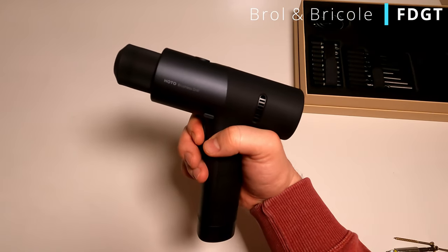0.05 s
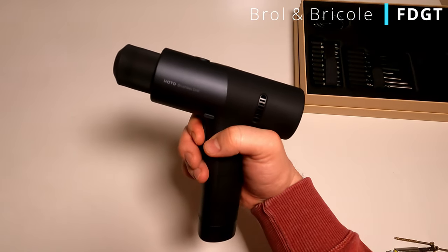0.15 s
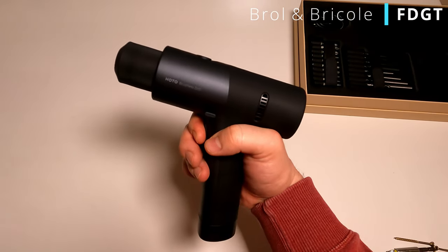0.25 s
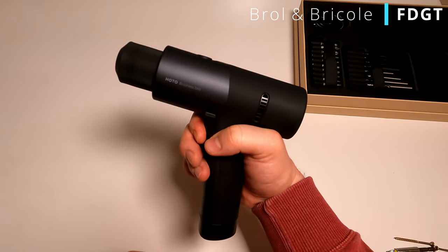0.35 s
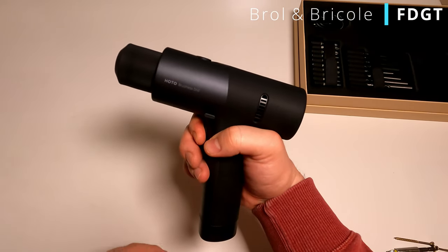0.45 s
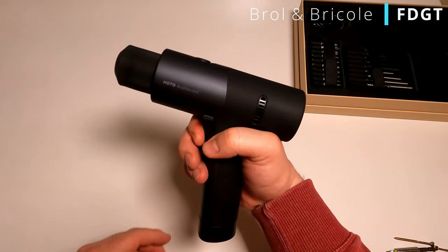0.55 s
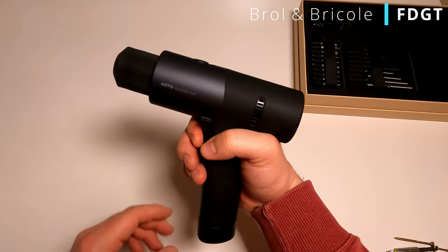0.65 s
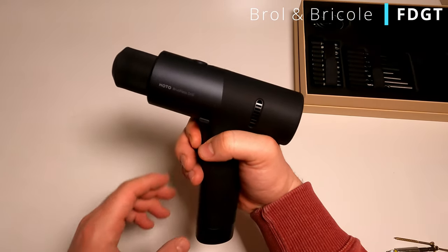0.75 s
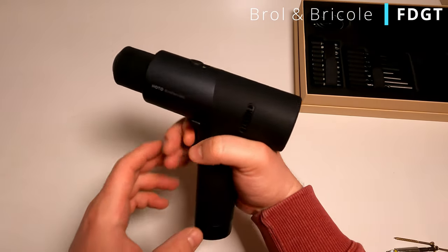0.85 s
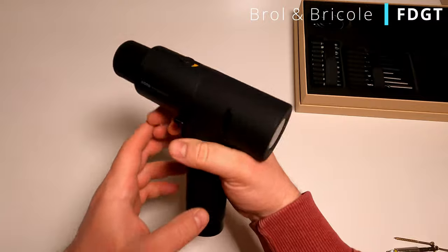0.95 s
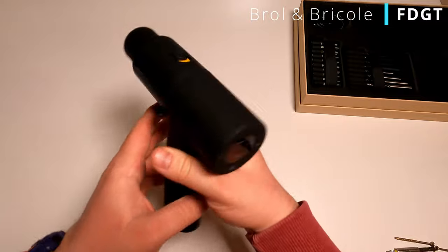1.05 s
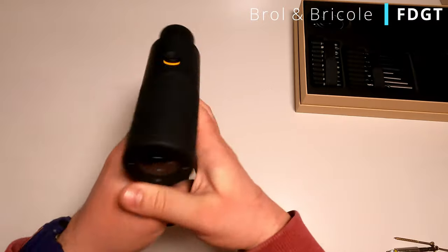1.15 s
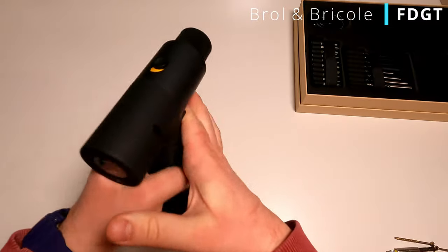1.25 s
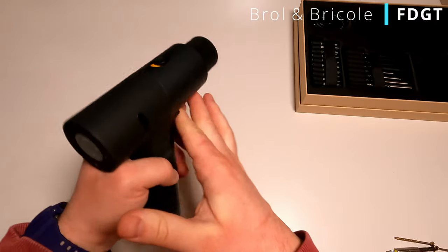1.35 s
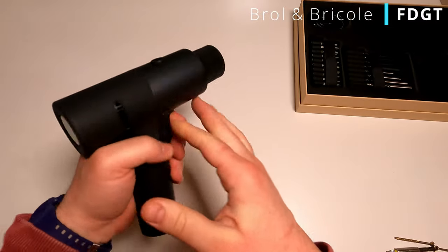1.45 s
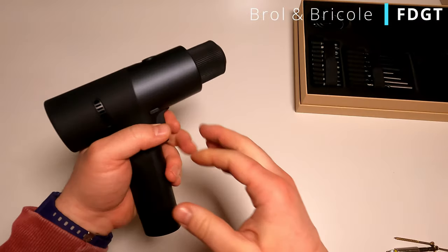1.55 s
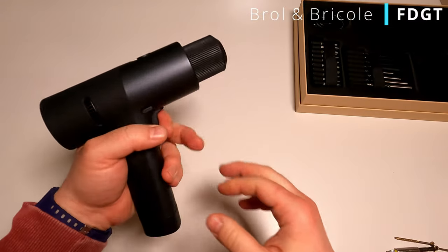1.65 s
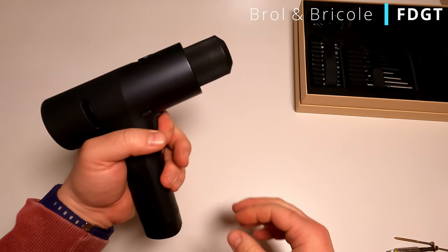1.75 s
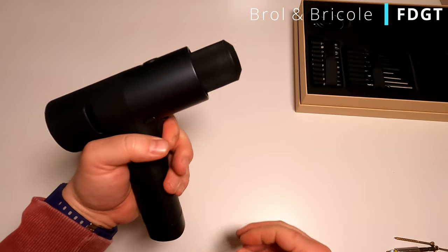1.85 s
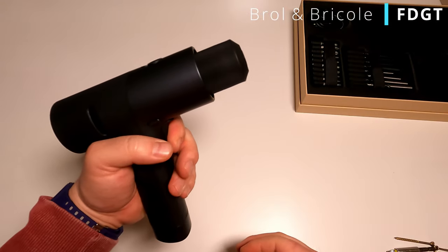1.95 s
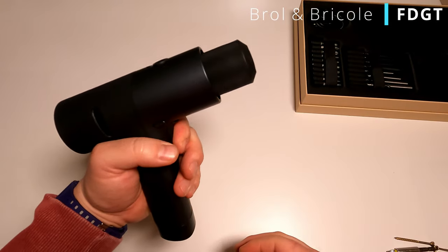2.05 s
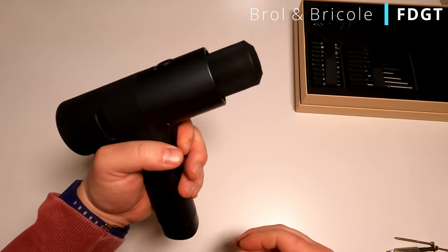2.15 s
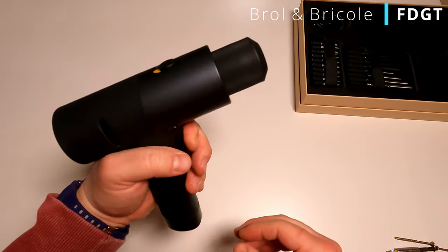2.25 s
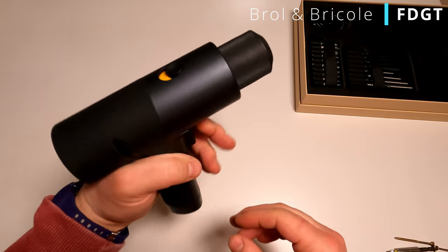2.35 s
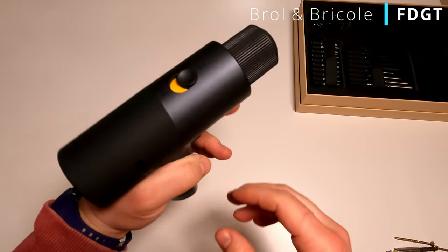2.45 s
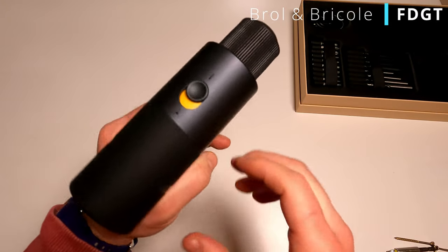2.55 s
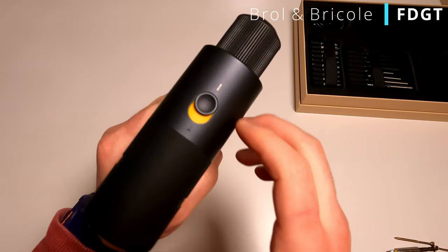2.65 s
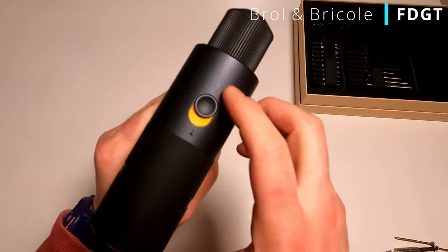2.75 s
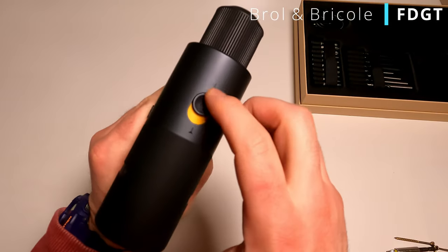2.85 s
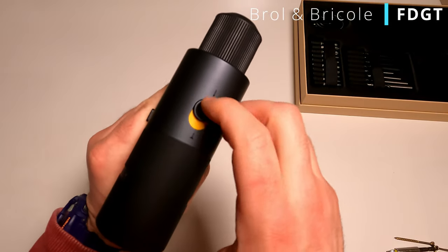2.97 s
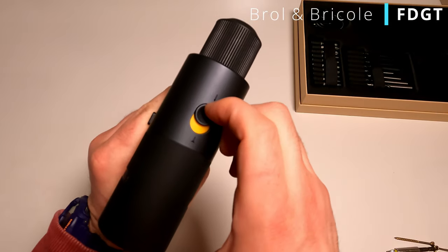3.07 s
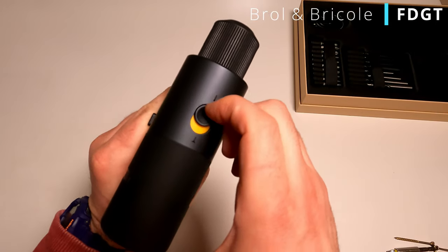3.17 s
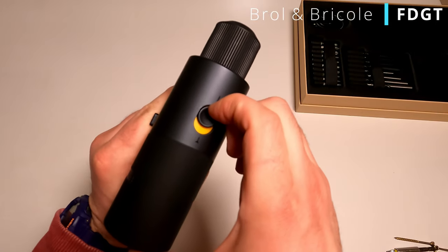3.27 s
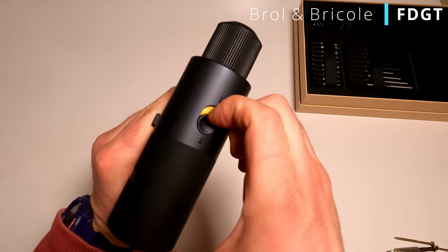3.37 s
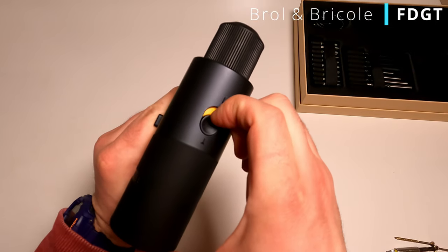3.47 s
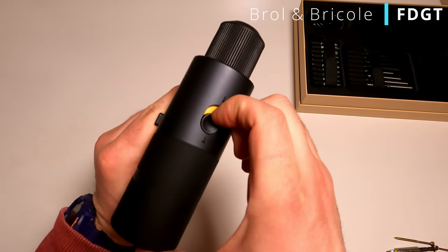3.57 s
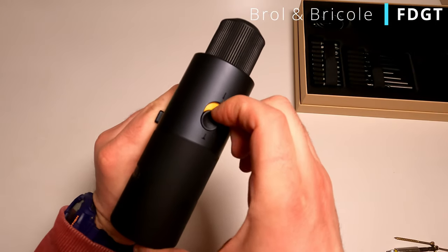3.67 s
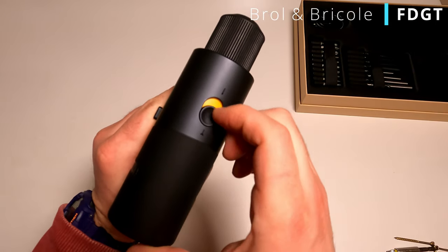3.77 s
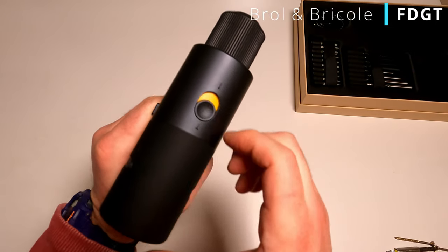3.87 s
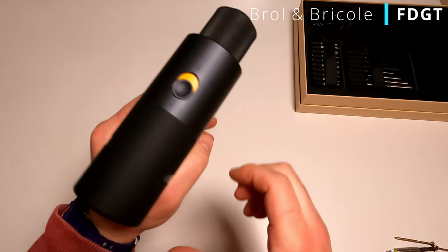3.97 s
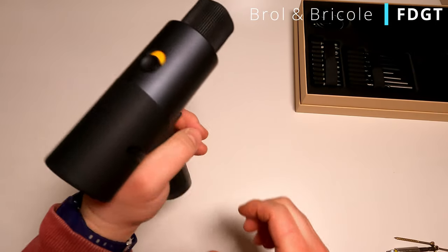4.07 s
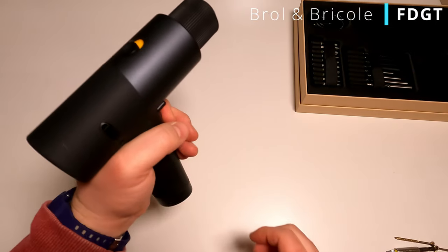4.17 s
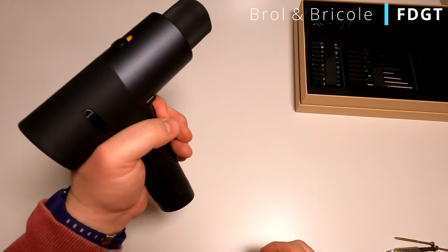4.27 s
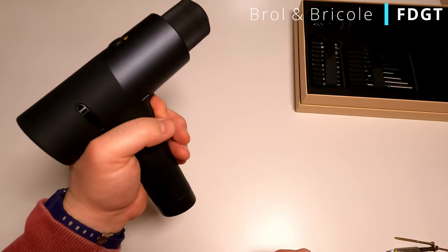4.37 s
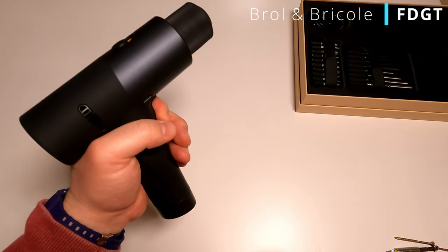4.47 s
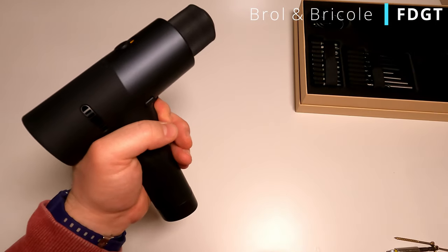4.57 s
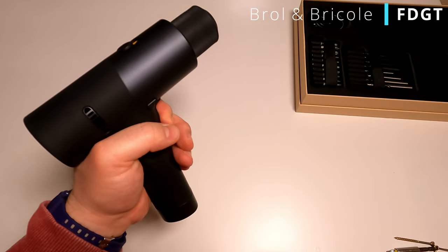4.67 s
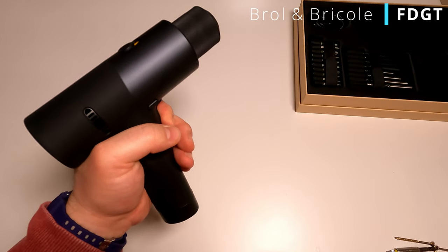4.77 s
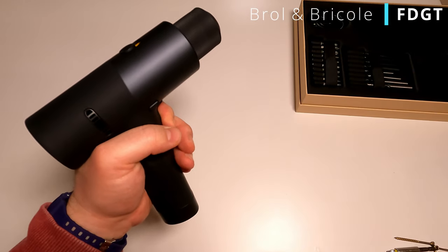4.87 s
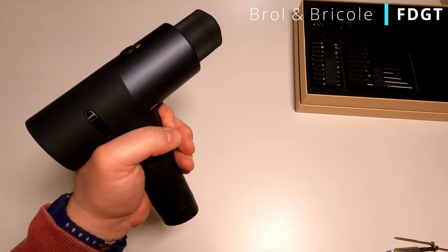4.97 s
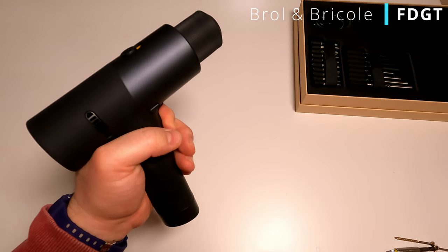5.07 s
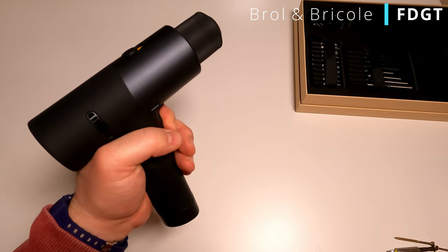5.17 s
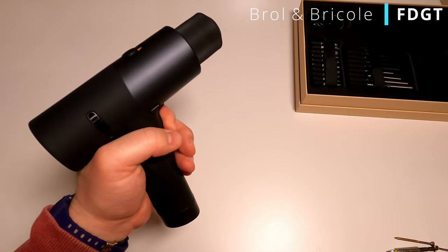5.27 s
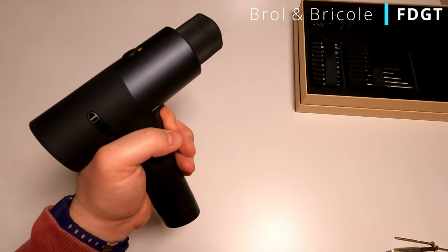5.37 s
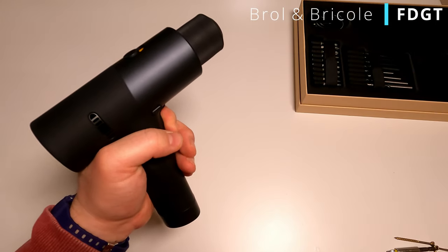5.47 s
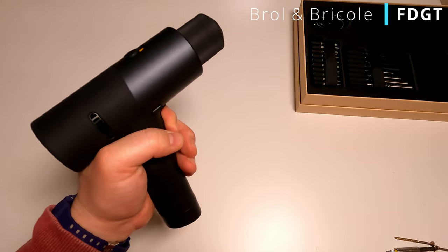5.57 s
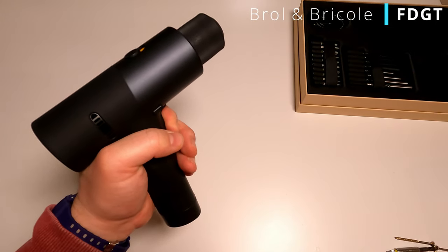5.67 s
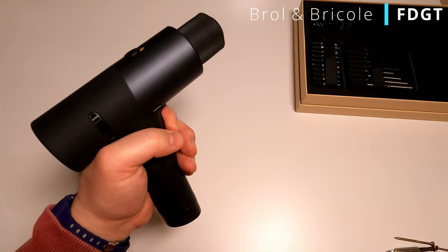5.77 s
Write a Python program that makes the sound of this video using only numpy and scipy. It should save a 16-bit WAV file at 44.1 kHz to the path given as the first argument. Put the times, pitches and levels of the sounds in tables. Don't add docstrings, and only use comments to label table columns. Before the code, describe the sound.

A small brushless screwdriver, already running, whirs and rattles in quick regular surges, then brakes with clicks. Soft grip rustling follows, then a trigger click and a shorter run. Faint finger rubs lead to one sharp slider snap, then another click starts a longer pulsing run that never stops. Close stereo pickup over a table in a quiet, lightly ringing room.

```python
import sys
import numpy as np
from scipy import signal
from scipy.fft import rfft, irfft, next_fast_len
from scipy.io import wavfile
from scipy.ndimage import map_coordinates

SR = 44100
rng = np.random.default_rng(int(sys.argv[2]) if len(sys.argv) > 2 else 0)


def store_pcm(level_fs):
    pcm = np.round(np.clip(level_fs, -1, 1) * 32767).astype(np.int16)
    wavfile.write(sys.argv[1], SR, np.atleast_2d(pcm).T)


def voltage_ratio(decibels):
    exponent = np.asarray(decibels, float) / 20
    return 10 ** exponent


N = 256662

# power_on_s, first_kick_s, trigger_released_s, rotor_braked_s, spindle_locked_s
RUNS = [
    (-.3, -.059, 1.0, 1.125, 1.16),
    (1.8, 2.021, 2.43, 2.5, 2.525),
    (4.187, 4.3985, 6, 6.1, 6.2),
]


def motor():
    orders = [3, 4, 5, 6, 7, 8]
    order_levels = [1, -6.5, 0, -13, 0.5, 0.5]
    # carrier_hz, sideband in electrical orders (the upper carrier is a folded overtone)
    switching_tones = [(9968, 1), (9968, 0), (9968, -1), (9968, 2), (14032, -1), (14032, 0)]
    switching_levels = [-16.5, -24, -19.5, -43.5, -27.5, -52.5]
    whine_levels = [-3.5, -5.5, -2.5]
    # freq_hz, level_db
    shells = [
        [(800, -6), (1200, 1), (1400, -1), (1650, -6), (1900, -9.5), (2050, 1.5), (2350, -5), (2550, -5),
         (2800, -1.5), (3050, -3), (3300, -17), (3700, -7.5), (4500, -20.5)],
        [(900, -13.5), (1200, -8.5), (1400, -16), (1650, -2), (1900, -4.5), (2050, -11.5), (2350, -18),
         (2550, -3), (2800, -10.5), (3050, 1), (3300, -6.5), (3700, -7.5), (4500, -24)],
        [(800, -12), (1200, -8.5), (1400, -7), (1650, 1.5), (1900, 3), (2050, 0), (2350, -9), (2550, -1.5),
         (2800, -6.5), (3050, 3.5), (3300, -11), (3700, -3), (4500, -40)],
    ]
    # freq_hz, density_db (per Hz)
    gear_colours = [
        [(70, -56), (230, -21.5), (800, -18), (960, -7), (1210, -8), (1390, -7), (1850, -5), (2260, -13.5),
         (2880, -5), (3600, -5.5), (6560, -13.5), (8180, -22), (11000, -32.5), (14700, -56)],
        [(70, -61.5), (150, -26), (860, -19.5), (1160, -8.5), (1370, -11.5), (1850, -3), (2310, -10),
         (3120, -7), (3450, -5.5), (5500, -12.5), (7110, -12.5), (8350, -25), (11000, -32), (14700, -60.5)],
        [(70, -71), (170, -22.5), (860, -22), (1210, -12.5), (1340, -18), (1890, -4.5), (2260, -17), (3120, -7),
         (4480, -12), (5600, -14), (7400, -9), (8350, -24), (11000, -33), (14700, -67.5)],
    ]
    # freq_hz, left_minus_right_db
    tilts = [
        [(150, 1.5), (700, -2.5), (4000, -1), (9000, .5)],
        [(150, 0), (700, 0), (4000, .5), (9000, 1.5)],
        [(150, -1), (700, 0), (4000, 1.3), (9000, 2.5)],
    ]
    # freq_hz, left_lead_rad
    left_lead = [(0, 0), (1500, -0.3), (3000, -.65), (8800, -0.3), (9900, -.7), (10400, 0)]
    # freq_hz, left_right_likeness (0-1)
    likeness = [(100, 1), (500, 0.95), (2000, 1), (6000, 0.98), (12000, 0.54)]

    surge, sag_share, push, linger, rattle_db, jolt_db = kicks()
    cruise_hz, lag, loss, early_db, gains = runs()
    t = np.arange(N) / SR
    slow = lag + loss
    hz = cruise_hz * (1 - slow) * (1 + surge)
    turn = 2 * np.pi * np.cumsum(hz * (1 + 0.0015 * wobble(150))) / SR

    push_db = 6 * push
    upper_db = jolt_db - 60 * lag - 30 * loss + 6 * (linger - push)
    tone_db = push_db - 14 * lag + early_db
    middle_db = -22 * sag_share ** 2
    coils = []
    for k, order_db in zip(orders, order_levels):
        level_db = order_db + tone_db + 2.2 * wobble(30)
        level_db += upper_db if k > 4 else -jolt_db
        if 3 < k < 7:
            level_db += middle_db
        coils.append(voltage_ratio(level_db) * np.sin(k * turn + rng.uniform(0, 6)))

    whine = np.zeros(N)
    for (carrier_hz, k), db in zip(switching_tones, switching_levels):
        level_db = db + 3 * push + 3.0 * wobble(8.7)
        whine += voltage_ratio(level_db) * np.sin(2 * np.pi * carrier_hz * t + k * turn)

    load = 1.5 * np.cos(turn / 2) + 0.31 * np.cos(turn) + 1.03 * wobble(400)
    gate = unit(voltage_ratio((1 + 1.8 * slow) * load + 1.0 * wobble(30)))

    out = np.zeros((2, N))
    for gain, shell, colour, whine_db, tilt in zip(gains, shells, gear_colours, whine_levels, tilts):
        tones = sum(voltage_ratio(along(shell, k * hz) - 0.5) * coil for k, coil in zip(orders, coils))
        rattle = voltage_ratio(rattle_db) * gate * noise(colour, likeness)
        out += placed(gain * (rattle + tones + voltage_ratio(whine_db) * whine), tilt, left_lead)
    return out


def kicks():
    kick_every_s, surge_depth = .2605, .622
    surge_lag_s, surge_rise_s, sag_from_s, sag_to_s = .006, .012, .054, .212
    tone_rise_s, tone_fall_s, upper_fall_s = 0.0026, .012, 0.054
    t, since = np.arange(N) / SR, np.ones(N)
    for _, first, _, braked, lock in RUNS:
        phase = (np.minimum(t, braked) - first) % kick_every_s
        since = np.where((t >= first) & (t < lock), phase, since)

    def push(rise_s, fall_s):
        return (1 - np.exp(-since / rise_s)) * np.exp(-np.maximum(since - 0.1, 0) / fall_s)

    sag = np.cos(np.pi / 2 * np.clip((since - sag_from_s) / (sag_to_s - sag_from_s), 0, 1)) ** 2
    surge_share = (1 - np.exp(-np.maximum(since - surge_lag_s, 0) / surge_rise_s)) * sag
    rattle_db = 4 * push(0.0088, 0.039)
    jolt_db = 7 * np.interp(since, [.002, .006, .011, .022], [0, 1, .8, 0])
    tone_push, upper_push = push(tone_rise_s, tone_fall_s), push(tone_rise_s, upper_fall_s)
    return surge_depth * surge_share, 1 - surge_share, tone_push, upper_push, rattle_db, jolt_db


def runs():
    # cruise_hz, spin_up_s, level_db, inrush_db, early_db (coil tones before the first kick)
    drives = [
        (396, 0.021, -26.5, -0.5, 0),
        (398, .028, -26, 1, 0),
        (406.8, .021, -29.5, 0.4, 3),
    ]
    attack_s, attack_db, inrush_s, brake_db = 0.041, 12.5, .2, 5.5
    t, hz = np.arange(N) / SR, np.ones(N)
    lag, loss, early_db, gains = np.zeros(N), np.zeros(N), np.zeros(N), []
    for (on, first, release, braked, lock), drive in zip(RUNS, drives):
        cruise_hz, spin_up_s, level_db, inrush_db, before_kick_db = drive
        live, since = (t >= on) & (t < lock), np.maximum(t - on, 0)
        brake = np.clip((t - release) / (braked - release), 0, 1) ** 1.8
        hz = np.where(live, cruise_hz, hz)
        lag = np.where(live, np.exp(-(since / spin_up_s) ** 1.3), lag)
        loss = np.where(live, .47 * brake, loss)
        early_db = np.where(live & (t < first), before_kick_db, early_db)
        rise_db = -attack_db * np.clip(1 - since / attack_s, 0, 1)
        rush_db = inrush_db * np.exp(-since / inrush_s)
        gains.append(live * voltage_ratio(level_db + rise_db + rush_db - brake_db * brake))
    return hz, lag, loss, early_db, gains


def placed(x, tilt, lead):
    m = next_fast_len(N + 8192)
    hz = np.fft.rfftfreq(m, 1 / SR)
    half = voltage_ratio(along(tilt, hz) / 2) * np.exp(.5j * along(lead, hz))
    return irfft(rfft(x, m) * [half, 1 / half], m)[:, :N]


def clicks():
    # start_s, peak_db
    presses = [
        (1.793, -5.5),
        (4.173, -4.5),
    ]
    # freq_hz, level_db, t60_s
    trigger_modes = [(2180, -20, 0.015), (3115, 4, 0.0099), (3440, -2, 0.0068), (5100, -24, 0.023),
                     (6900, -13, 0.0065), (8800, -28.5, 0.015)]
    # start_s, peak_db, centre_hz
    ticks = [(1.146, -15, 2895), (1.15, -9, 2660), (1.167, -26, 1215), (1.389, -34, 3230),
             (1.699, -45.5, 3900), (1.834, -19, 3220), (2.511, -16, 2790), (2.518, -10, 3120),
             (2.534, -25, 1600), (2.8, -39, 4180), (2.987, -56, 2120), (3.173, -46, 1540),
             (3.244, -44, 1520), (3.323, -40, 1450), (3.368, -45.5, 2890), (3.421, -40, 2870),
             (3.47, -31, 2950), (3.5158, -3.5, 2004), (3.5204, -11.5, 4010), (4.039, -54, 1130),
             (4.209, -15, 3030)]
    # freq_hz, level_db
    plastic = [(200, -72.5), (600, -30), (1300, -3.5), (2200, -4), (3400, -3), (5500, -7), (7000, -9),
               (9500, -21), (14000, -31), (17000, -71.5)]
    tick_t60_s, ring_t60_s, ring_share = 0.011, 0.025, 0.43

    out, blows, t = np.zeros(N + SR), np.zeros(N + SR), np.arange(SR // 10) / SR
    f = np.fft.rfftfreq(len(t), 1 / SR)
    short = t < .08
    blow = np.roll(irfft(voltage_ratio(along(plastic, f)), len(t)), 40)
    blow /= np.linalg.norm(blow)

    ring = sum(voltage_ratio(level - 60 * t / t60) * np.sin(2 * np.pi * hz * t) for hz, level, t60 in trigger_modes)
    ring *= 1 - np.exp(-t / 0.0043)
    for s, db in presses:
        out[round(s * SR):][:len(t)] += voltage_ratio(db + 12) * ring
        blows[round(s * SR):][:len(t)] += voltage_ratio(db + 15) * ring

    for s, db, hz in ticks:
        dulling_db = 0.049 * (db + 21.5) * np.log2(f / 3000 + .05)
        peak = 0.27 + 1 / (1 + ((f - hz) / (0.1 * hz)) ** 2)
        colour = voltage_ratio(along(plastic, f) - dulling_db) * peak
        burst = np.roll(rng.standard_normal(len(t)) * voltage_ratio(-60 * t / tick_t60_s), 30)
        crack = irfft(rfft(burst) * colour, len(t)) * short
        crack = crack / abs(crack).max() + .6 * blow / abs(blow).max() * short
        if hz < 1800:
            tone = np.sin(2 * np.pi * hz * t) * voltage_ratio(-60 * t / ring_t60_s)
            crack += ring_share * tone * (1 - np.exp(-t / .001))
        crack *= voltage_ratio(db) / abs(crack).max()
        out[round(s * SR):][:len(t)] += crack
        blows[round(s * SR):][:len(t)] += blow * np.linalg.norm(crack) * short
    slightly_right = voltage_ratio([[-.3], [.3]])
    return table(out[None, :N] * slightly_right, echo_db=-7, delay=.0037), blows[None, :N]


def table(x, echo_db, delay):
    return x + voltage_ratio(echo_db) * np.pad(x, ((0, 0), (round(delay * SR), 0)))[:, :N]


def hands():
    # start_s, end_s, rustle_db
    shifts = [
        (1.3, 1.47, -59),
        (1.45, 1.72, -54.5),
        (1.68, 1.8, -63),
        (2.72, 3.25, -69),
        (3.38, 3.52, -81.5),
        (3.75, 4.1, -71.5),
        (4.06, 4.2, -61),
    ]
    # freq_hz, density_db (per Hz)
    skin = [(180, -30.5), (300, -7.5), (389, -6.5), (1000, -36.5), (1160, -22), (1300, -8.5), (2490, -7.5),
            (3280, -8), (5610, -8), (7900, -13.5), (14700, -36.5)]
    # start_s, end_s, centre_hz, width_hz, level_db
    rubs = [(1.3, 1.43, 7200, 1500, -65.5), (1.5, 1.69, 6900, 2400, -55), (1.5, 1.65, 2620, 260, -56),
            (2.81, 2.86, 4195, 270, -70), (2.865, 2.935, 3700, 220, -65), (2.871, 2.93, 5200, 900, -67.5),
            (2.8, 3.03, 6900, 1200, -67.5), (2.97, 3.01, 1700, 270, -70), (2.98, 3.055, 3870, 300, -69),
            (3.055, 3.13, 4180, 350, -68), (3.04, 3.19, 1680, 180, -65), (3.15, 3.185, 4090, 350, -64),
            (3.15, 3.18, 7000, 1500, -69.5), (3.504, 3.518, 3060, 2500, -48), (3.88, 3.98, 3450, 350, -72),
            (3.87, 4.0, 1360, 200, -70)]
    out = swells(shifts) * noise(skin, [(1000, 0.66)])
    for start, end, hz, width, db in rubs:
        n = round((end - start) * SR)
        band = 1 / (1 + ((np.fft.rfftfreq(n, 1 / SR) - hz) / width) ** 2)
        rub = unit(irfft(rfft(rng.standard_normal(n)) * band, n))
        out[:, round(start * SR):][:, :n] += voltage_ratio(db) * np.hanning(n) ** .5 * rub
    return out * unit(voltage_ratio(1.5 * wobble(40) + 1.5 * wobble(300)))


def room(x):
    # freq_hz, t60_s
    decay = [(300, 0.58), (1000, 0.45), (5500, 0.42), (12000, 0.25)]
    hz, t, z = signal.stft(rng.standard_normal((2, SR // 2)), SR, nperseg=256)
    tail = signal.istft(z * voltage_ratio(-60 * t / along(decay, hz)[:, None]), SR, nperseg=256)[1]
    late = np.pad(x.mean(0), (350, 0))[None]
    return signal.fftconvolve(late, tail / np.linalg.norm(tail[0]), axes=1)[:, :N]


def air():
    # start_s, end_s, rumble_db
    leans = [(-.1, .36, -65), (.93, 1.3, -56), (1.25, 1.79, -51), (1.82, 2.1, -49.5), (2.4, 2.74, -48.5),
             (3.46, 3.6, -58), (3.8, 4.0, -57.5), (3.98, 4.08, -45), (4.12, 4.55, -53), (4.55, 4.8, -60),
             (5.47, 5.68, -52)]
    # freq_hz, density_db (per Hz)
    rumble_colour = [(12, -52), (20, -37.5), (48, 1), (65, 2.5), (103, -8.5), (134, -22.5), (160, -26),
                     (210, -53), (350, -120)]
    murmur_colour = [(59, -25), (100, -10), (134, -2), (311, -11.5), (486, -22.5), (800, -31), (1200, -18),
                     (1560, -34.5), (2640, -120)]
    loud_ends = [1.16, 2.525, 3.56]
    still_db, murmur_db, stir_db = -67, -65.5, -15.5
    duck_db, recover_s = -8, .2

    lean, t = swells(leans), np.arange(N) / SR
    rumble = (voltage_ratio(still_db) + lean) * unit(voltage_ratio(1.5 * wobble(9)) * noise(rumble_colour, [(50, 0.99)]))
    sink_db = np.zeros(N)
    for end in loud_ends:
        sink_db += duck_db * (t > end) * np.exp(-(np.maximum(t - end, 0) / recover_s) ** 2)
    stirred = voltage_ratio(murmur_db + 2.5 * wobble(4)) + voltage_ratio(stir_db) * lean
    return rumble + voltage_ratio(sink_db) * stirred * noise(murmur_colour, [(200, 0.81)])


def swells(rows):
    t = np.arange(N) / SR
    return sum(voltage_ratio(db) * np.sin(np.pi * np.clip((t - a) / (b - a), 0, 1)) ** 0.53 for a, b, db in rows)


def noise(spectrum, alike):
    m = next_fast_len(N + 8192)
    hz = np.fft.rfftfreq(m, 1 / SR)
    turn = np.arccos(np.clip(along(alike, hz), -1, 1)) / 2
    coloured = rfft(rng.standard_normal((2, m))) * voltage_ratio(along(spectrum, hz))
    mid, side = irfft(coloured * [np.cos(turn), np.sin(turn)], m)[:, :N]
    return unit(np.array([mid + side, mid - side]))


def wobble(rate):
    return map_coordinates(rng.standard_normal(int(N * rate / SR) + 4), [np.arange(N) * rate / SR])


def along(points, hz):
    f, v = np.transpose(points)
    return np.interp(np.log(hz + 1), np.log(f + 1), v)


def unit(x):
    return x / np.sqrt(np.mean(x ** 2) + 1e-20)


def scene():
    drill = motor()
    snaps, blows = clicks()
    ringing = room(voltage_ratio(-16.0) * drill + voltage_ratio(-7) * blows)
    return drill + snaps + ringing + hands() + air()


def roll_off(x):
    return signal.sosfilt(signal.butter(12, 14810, fs=SR, output="sos"), x)


def record(dry):
    return roll_off(dry)


dry = scene()
out = record(dry)
store_pcm(out)
```